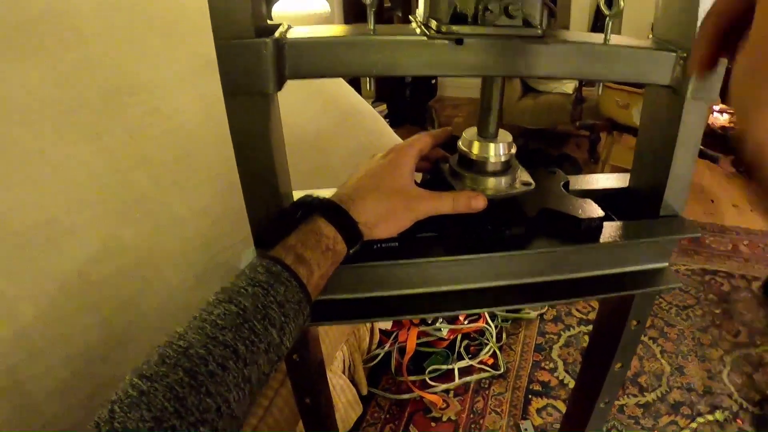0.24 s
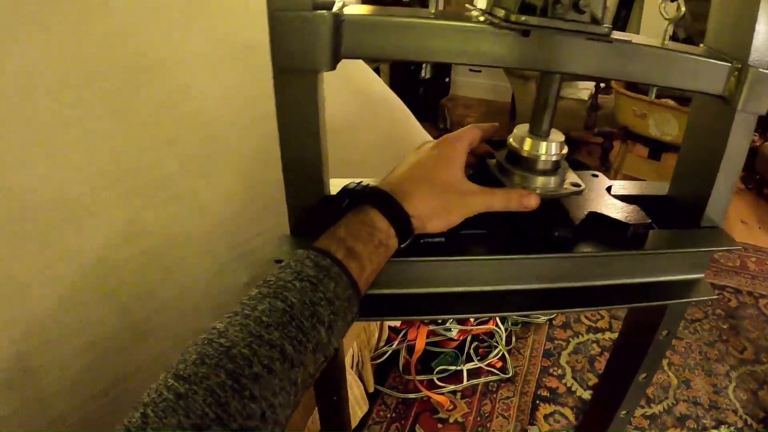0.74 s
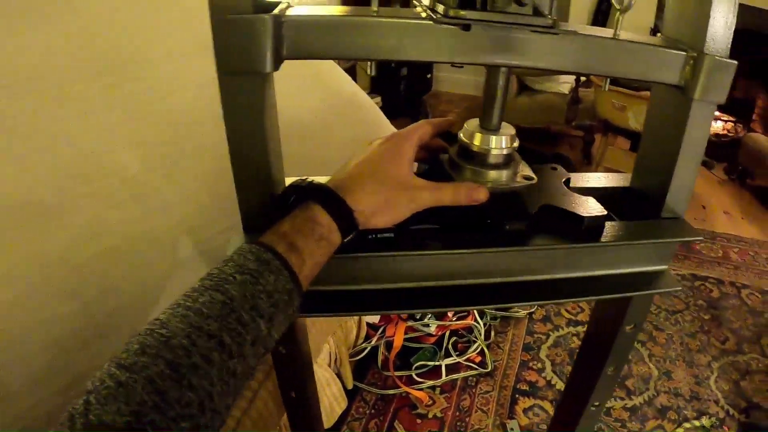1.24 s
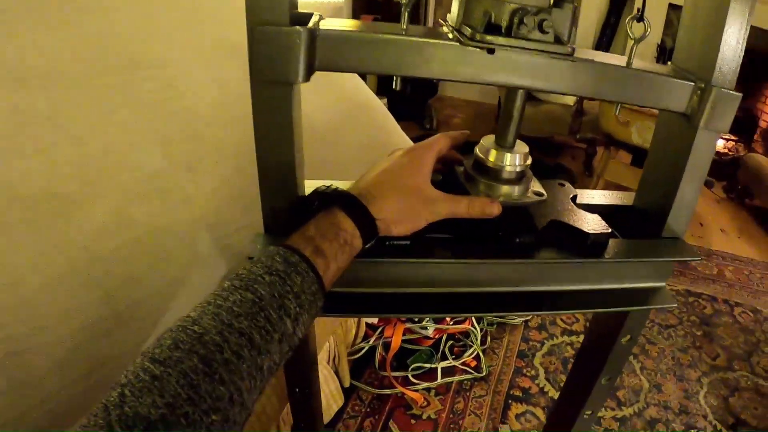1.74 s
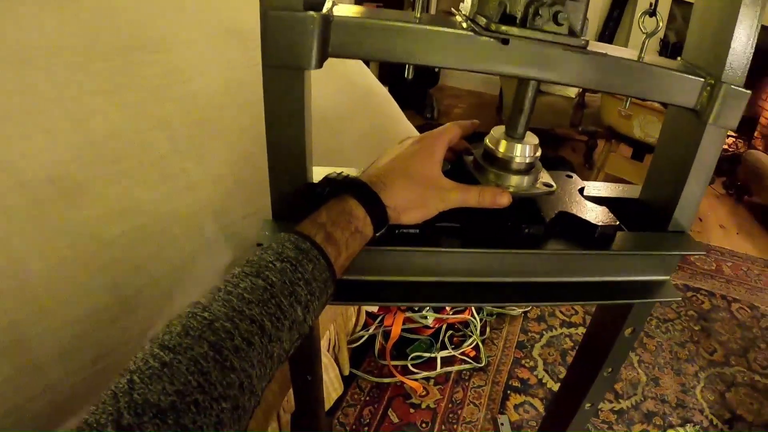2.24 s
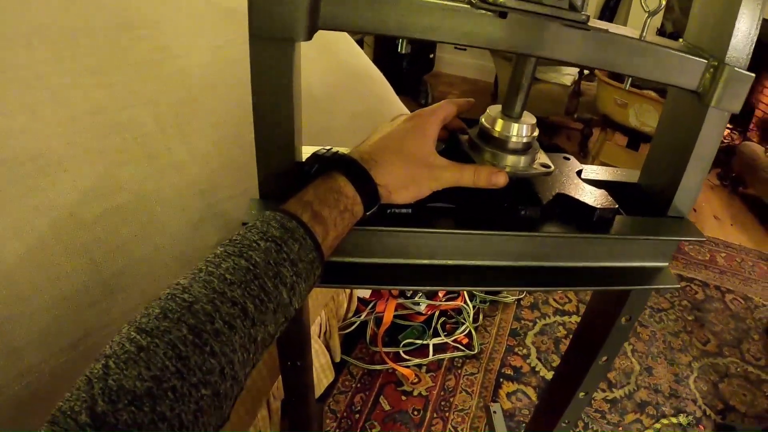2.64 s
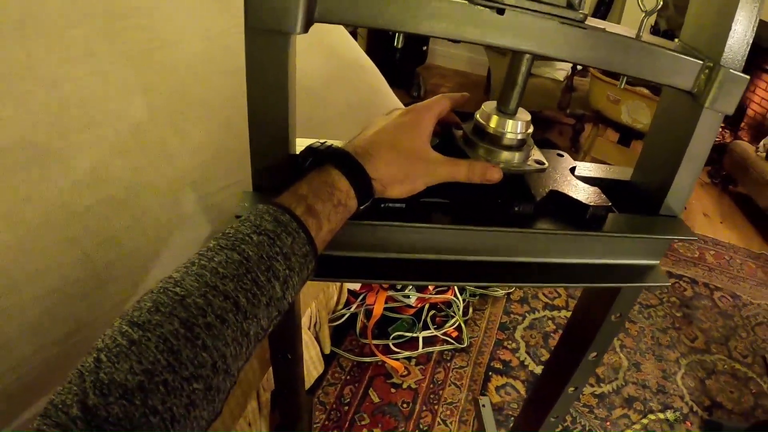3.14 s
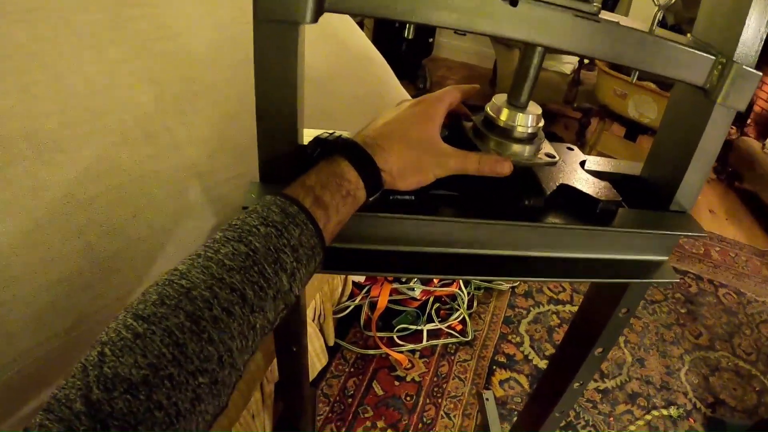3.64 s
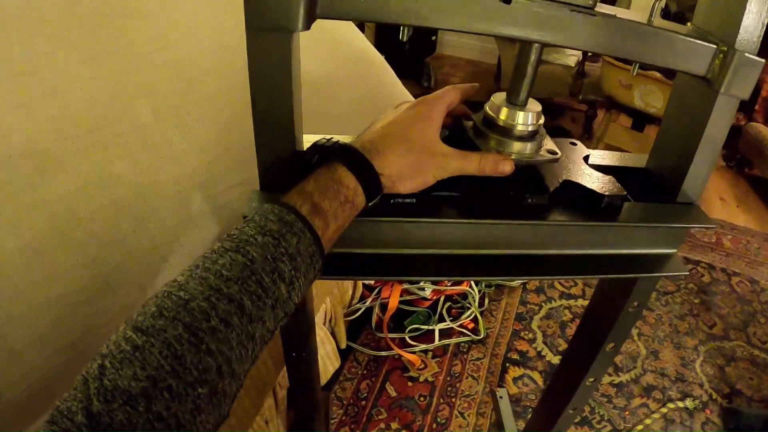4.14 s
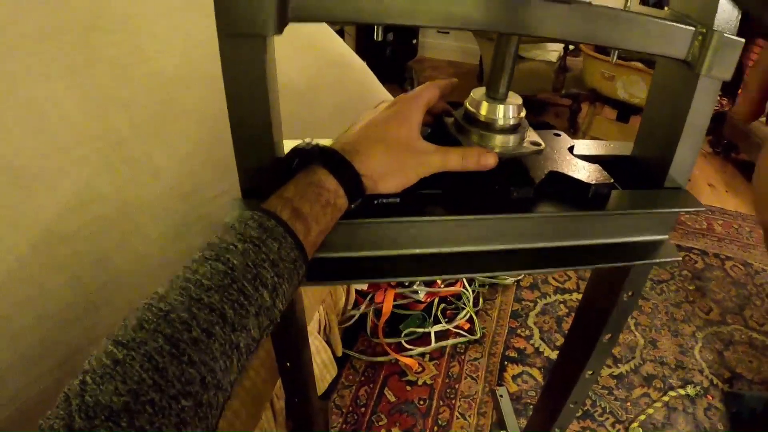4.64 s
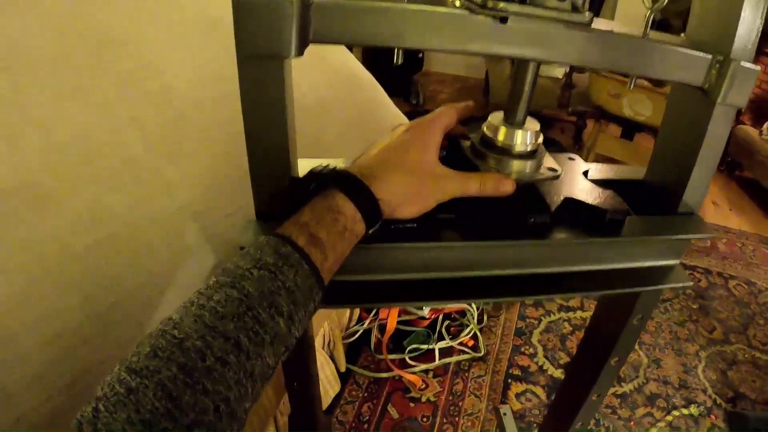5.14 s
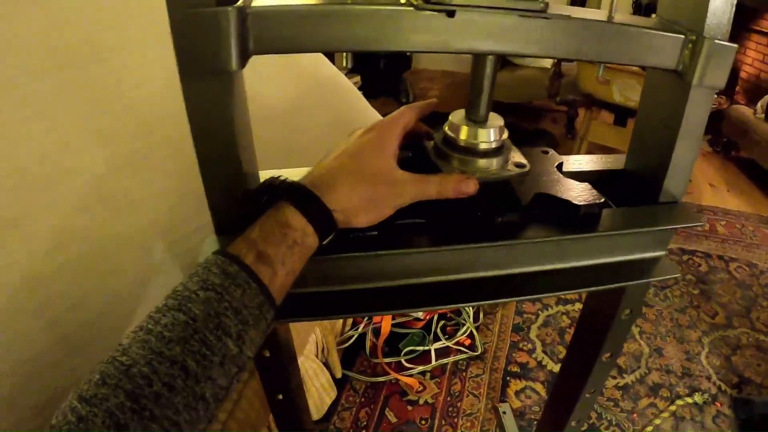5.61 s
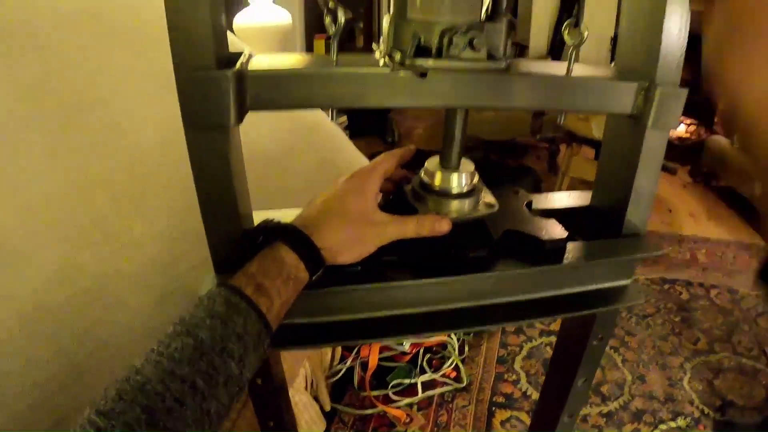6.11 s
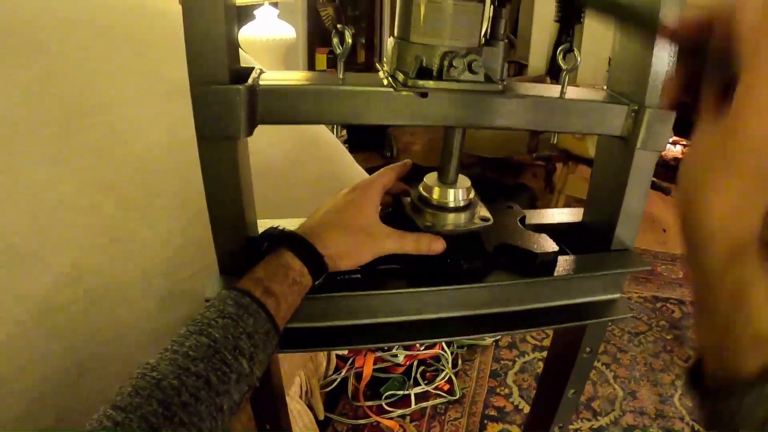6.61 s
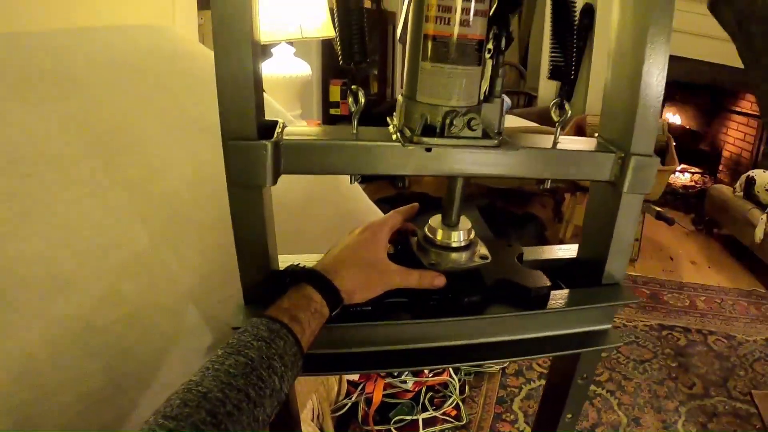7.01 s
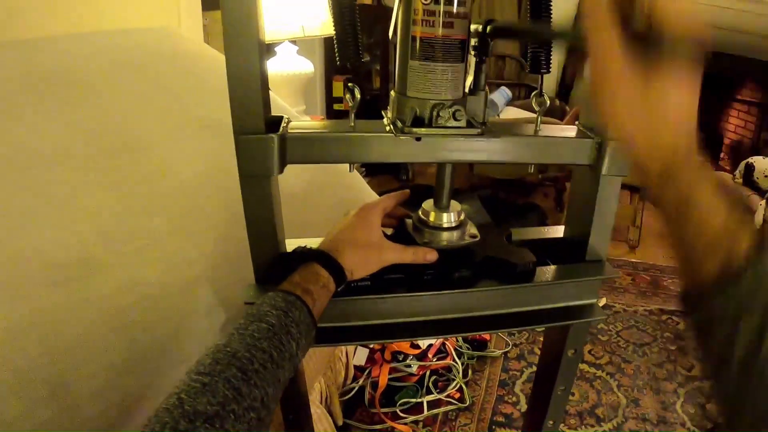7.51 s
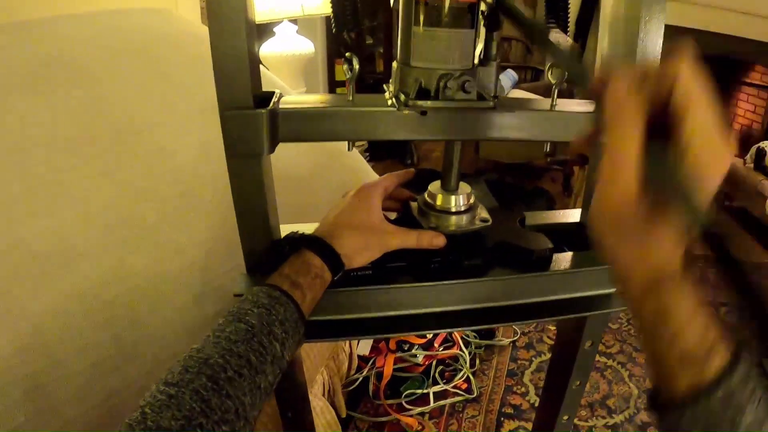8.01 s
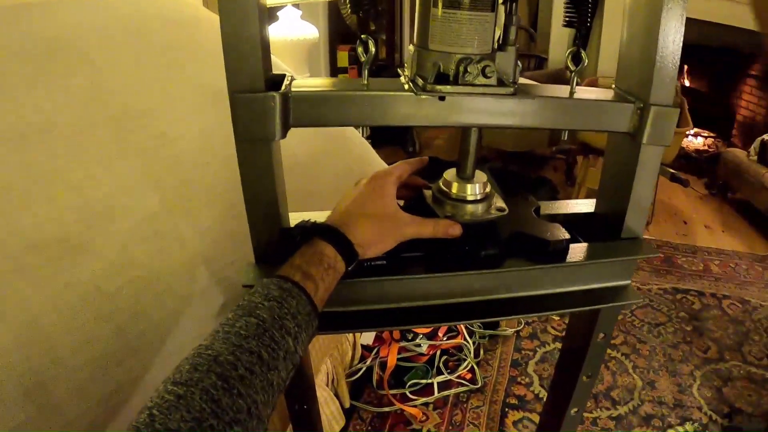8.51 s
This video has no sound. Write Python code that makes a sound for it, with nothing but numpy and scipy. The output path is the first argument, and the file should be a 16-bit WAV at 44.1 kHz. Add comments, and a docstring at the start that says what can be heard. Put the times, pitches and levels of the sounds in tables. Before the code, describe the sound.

A hydraulic jack on a steel shop press is pumped by hand, about three strokes every two seconds. Each stroke gives a metallic clack, usually followed by a dull thud, then the handle rattles in its socket and seats with a sharp tick and a short ping. Oil sings very faintly in the valve now and then. The room is quiet, with a brief ring, and the microphone is close.

```python
"""A bottle jack on a steel shop press is pumped by hand, about three strokes in two seconds, in a quiet
carpeted room. On a stroke the linkage takes up its slack, the pin scrapes and clacks, and the lever meets
its stop. On most strokes the piston then bottoms out with a thud; the hard ones rock the whole frame.
On the way back the handle rattles in its socket, then seats with a sharp tick and a short ping.
Now and then oil sings faintly in the valve, and the frame and the room ring on behind the blows."""
import sys
import numpy as np
from scipy import signal
from scipy.fft import rfft, irfft, next_fast_len
from scipy.io import wavfile
from scipy.ndimage import uniform_filter1d

SR = 44100
rng = np.random.default_rng(int(sys.argv[2]) if len(sys.argv) > 2 else 0)


def persist_wave(psi):
    """Save psi, clipped to +-1, as 16-bit WAV."""
    counts = np.round(np.clip(psi, -1, 1) * 32767).astype(np.int16)
    wavfile.write(sys.argv[1], SR, np.atleast_2d(counts).T)


N = 386302

# Levels in the cue lists are relative: each layer adds its own trim.
# Weight is a boost under about 1.7 kHz, sparkle a boost over about 4.8 kHz.
# One clack a stroke. Each row: start in seconds, pin level in dB, pin weight in dB, slack level in dB,
# wait until the stop in seconds, stop level in dB, stop weight in dB.
CLACKS = [(0.0141, -25.5, 0.5, -35, 0.014, -24.5, 8), (0.681, -22, -11.5, -32.5, .012, -26, 5.5),
          (1.9961, -22, -4, -34, .012, -24.5, 5), (2.6167, -22, -8, -36.5, 0.012, -24.5, 6),
          (3.261, -21.5, -13, -41.5, .012, -24, 4), (3.892, -23, -6, -36, .012, -24, 4),
          (4.537, -22.5, -4, -34.5, .012, -26.5, 5.5), (5.208, -21, -2.5, -34.5, .012, -26.5, 9.5),
          (5.867, -21, -13.5, -35.5, .013, -25, 11.5), (6.529, -23.5, -12, -50, .028, -23.5, 8.5),
          (7.2426, -22.5, 0.5, -38.5, .009, -25, 7.5), (7.935, -23.5, 2, -40, .009, -24, 6.5),
          (8.615, -23, -1.5, -44, .008, -22.5, 5.5)]
# The piston bottoms out. Each row: start in seconds, level in dB, weight in dB.
THUDS = [(0.209, -25.5, -10.5), (0.939, -50.5, -3), (1.549, -30.5, -7), (2.184, -29, -11.5),
         (2.8165, -30, -10), (3.455, -29.5, -10.5), (4.756, -39, -8), (5.135, -47, 6), (6.098, -36, -5.5),
         (6.7855, -36, -1.5), (8.135, -22, -6.5)]
# The handle knocks in its socket and rebounds once.
# Each row: start in seconds, level in dB, wait until the rebound in seconds, rebound level in dB.
KNOCKS = [(0.282, -22.5, .07, -32), (0.999, -36.5, 0.04, -30.5), (1.343, -37, 0.052, -35),
          (1.616, -22, 0.058, -30.5), (2.2468, -26, 0.049, -33), (2.8799, -22.5, 0.057, -32),
          (3.5111, -22, 0.05, -32.5), (4.165, -25, 0.038, -34.5), (4.808, -25, 0.033, -28),
          (5.501, -26, .036, -27.5), (6.159, -23.5, 0.047, -27.5), (6.8432, -26.5, 0.044, -29.5),
          (7.542, -26.5, .007, -25.5), (8.198, -24, 0.047, -25)]
# Oil passes the valve. Each row: start in seconds, length in seconds, level in dB.
OIL_FLOWS = [(0.424, 0.19, -52.5), (1.427, 0.26, -54.5), (2.054, 0.24, -52), (3.005, .24, -53),
             (5.908, .4, -46), (6.654, .3, -55), (7.559, 0.33, -51)]
# The handle seats again. Each row: start in seconds, tick level in dB, ping level in dB.
TICKS = [(0.459, -26, -33), (1.144, -24.5, -42), (1.7682, -19, -28), (2.376, -32.5, -36), (3.0, -19, -27.5),
         (3.6454, -18, -28), (4.2654, -20.5, -39), (4.9022, -28.5, -26.5), (5.593, -20, -23.5),
         (6.2779, -18.5, -44), (6.9727, -16.5, -28), (7.64, -31, -42), (8.3348, -25.5, -32.5)]

# EQ curves for the room tone, each kind of blow and the reverb. Each row: frequency in Hz, gain in dB.
AIR_EQ = [(12, -43), (20, -2.5), (59, 10.5), (433, -1), (603, 3.5), (1270, 7.5), (1830, -11), (2340, -0.5),
          (3970, -16), (8620, -29.5), (15000, -65)]
SLACK_EQ = [(150, -23), (600, 1.5), (1600, -2), (2400, -1.5), (3100, -3), (3900, 0), (5000, -10),
            (7800, -16.5), (11500, -37), (15000, -71)]
PIN_EQ = [(100, -28), (450, -7.5), (700, -9.5), (1150, 2), (1900, -6.5), (2500, 3.5), (3000, 2), (3900, -2),
          (4900, -15.5), (6000, -8.0), (7200, -26.5), (9500, -26.5), (11500, -44.5), (15000, -57)]
STOP_EQ = [(100, -20.5), (300, -11), (450, -11), (650, -4), (930, -0.5), (1400, -8.5), (2600, -1),
           (4150, 6.5), (5100, -8.5), (6000, -9.5), (7200, -22.5), (8300, -16), (11500, -53), (15000, -49)]
THUD_EQ = [(60, -35), (250, -4), (650, 4.5), (1150, 6), (1550, -3.5), (1850, -2), (2150, -9), (2600, -5.5),
           (3300, -8.5), (4500, -19.5), (6500, -36.5), (9500, -49.5), (11500, -75), (15000, -70)]
RATTLE_EQ = [(100, -23.5), (400, -17.5), (1000, -10.5), (1300, -2.5), (1750, -18), (2550, 3), (2900, -0.5),
             (3600, 4.5), (5200, -4.5), (6100, -6), (7300, -14.5), (9700, -15), (11200, -42), (14500, -42)]
TICK_EQ = [(100, -34.5), (450, -16), (680, -4), (1650, -10), (2300, -6), (2800, -3.5), (4100, -3),
           (5000, -16), (6100, -13.5), (7200, -23.5), (9700, -30), (11200, -52), (14500, -55)]
ROOM_EQ = [(60, 9.5), (170, 7), (280, 9), (370, 1.5), (600, -1), (1000, -2.5), (1500, 1), (2100, 0.5),
           (3600, -7.5), (4300, -2.5), (5200, -3), (9000, -1), (14000, 5)]

# The steel frame's resonances. Each row: frequency in Hz, boost or cut in dB.
FRAME_RESONANCES = [(255, 4.5), (296, 2), (438, -1), (620, 11), (942, 10), (1595, 3), (1722, 2.5),
                    (1877, -2), (2560, 4), (3260, 7), (3914, 6), (5948, 1), (9648, -0.5)]
# The room's decay. Each row: frequency in Hz, time to fall 60 dB in seconds.
ROOM_DECAY = [(150, 0.43), (400, 0.33), (1100, 0.47), (2800, 0.45), (7000, 0.37), (14000, 0.25)]
# Modes of the press rocking on its legs and of the handle pinging.
# Each row: frequency in Hz, relative level in dB, time to fall 60 dB in seconds.
SWAY_MODES = [(32.9, -5.5, 0.43), (37.6, -2.5, 0.44), (46.7, -28, 0.83), (62.5, -29.5, 1),
              (81.4, -10, 0.31), (111, -35, 0.27)]
HANDLE_MODES = [(2333, 6, 0.013), (2290, 6.5, 0.042), (4125, -1, 0.024)]

# How alike diffuse sound is at the two microphones. Each row: frequency in Hz, correlation from 0 to 1.
STEREO_LIKENESS = [(60, 0.38), (250, 0.92), (2000, 0.72), (4000, 1), (8000, 0.3), (13000, 0.24)]
# Their balance. Each row: frequency in Hz, left minus right in dB.
STEREO_BALANCE = [(35, -21), (90, -10), (160, -1.5), (600, 2.5), (1200, -1), (2500, -5.5), (4000, -10),
                  (6000, -14.5), (9500, -12.5), (12000, -1.5)]
# Their phase offset. Each row: frequency in Hz, lead of the left side in radians.
STEREO_LEAD = [(60, 1.15), (260, 1.386), (4500, 1.41), (7000, 2.44), (12000, 3.1)]

MEDIUM_DB = -26.5  # a blow of middling force


def gain_of(db):
    """Decibels to amplitude."""
    return 10 ** (np.asarray(db) / 20)


def curve(points, hz):
    """Reads a curve along a log-frequency axis."""
    f, value = np.transpose(points)
    return np.interp(np.log(hz + 1), np.log(f), value)


def add(mix, start, sound):
    """Lays a sound into the mix at a start in seconds."""
    part = mix[..., max(0, round(start * SR)):][..., :sound.shape[-1]]
    part += sound[..., :part.shape[-1]]


def causal(gain):
    """A minimum-phase EQ: its ring follows the blow."""
    log_gain = np.log(np.maximum(gain, 1e-6))
    mirrored = np.concatenate([log_gain, log_gain[-2:0:-1]])
    return np.exp(np.conj(signal.hilbert(mirrored)))[:len(gain)]


def diffuse(spectra, hz):
    """Makes two unrelated spectra partly alike, as diffuse sound is at two microphones."""
    same = np.clip(curve(STEREO_LIKENESS, hz), -1, 1)
    return np.array([same * spectra[1] + np.sqrt(1 - same ** 2) * spectra[0], spectra[1]])


def flatten(spectra, bins):
    """Evens out stereo noise so that every wide band gets an equal share."""
    return spectra * causal(uniform_filter1d(abs(spectra[1]) ** 2, size=bins) ** -.5)


def ring(modes, t):
    """One dying sine a mode, summed."""
    return sum(gain_of(db - 60 * t / t60) * np.sin(2 * np.pi * hz * t) for hz, db, t60 in modes)


def by_force(hits, weight_db, sparkle_db, weight_slope=0, sparkle_slope=0):
    """Force sets a hit's colour: weight and sparkle tilt with its level, in dB per dB."""
    return [(start, db, weight_db + weight_slope * (db - MEDIUM_DB),
             sparkle_db + sparkle_slope * (db - MEDIUM_DB)) for start, db, *_ in hits]


def blows(hits, eq, trim_db, hold_s, treble_t60, bass_t60, alike, size=8192):
    """Steel chatters on steel for hold_s, then its crowded modes die fast, the low ones last.
    Each hit: start in seconds, then level, weight and sparkle in dB."""
    t, hz = np.arange(size) / SR, np.fft.rfftfreq(size, 1 / SR)
    low = 1 / (1 + (hz / 1700) ** 4)
    high = 1 - 1 / (1 + (hz / 4800) ** 6)
    envelopes = gain_of(-60 * np.maximum(t - hold_s, 0) / np.array([[treble_t60], [bass_t60]]))
    fade = np.cos(np.pi / 2 * t / t[-1]) ** 2
    same_parts = rng.standard_normal((2, size))  # the character these hits have in common
    out = np.zeros((2, N))
    for start, db, weight_db, sparkle_db in hits:
        chatter = np.sqrt(alike) * same_parts + np.sqrt(1 - alike) * rng.standard_normal((2, size))
        treble, bass = rfft(chatter * envelopes[:, None])
        burst = flatten(diffuse(treble * (1 - low) + bass * low, hz), bins=260)
        colour = causal(gain_of(curve(eq, hz) + weight_db * low + sparkle_db * high))
        blow = fade * irfft(burst * colour)
        attack_rms = np.sqrt(np.mean(blow[1, t < .008] ** 2))
        add(out, start, gain_of(db + trim_db) * blow / attack_rms)
    return out


def air(level_db=-55, swell_db=1.8):
    """A quiet bed of room tone, swelling a little."""
    t, hz = np.arange(N) / SR, np.fft.rfftfreq(N, 1 / SR)
    noise = diffuse(rfft(rng.standard_normal((2, N))), hz)
    wash = irfft(noise * gain_of(curve(AIR_EQ, hz)), N)
    swell = sum(np.sin(2 * np.pi * (rate_hz * t + rng.random())) for rate_hz in np.geomspace(.4, 6, 20))
    return gain_of(level_db + swell_db * swell / swell.std()) * wash / wash.std()


def pin_scrape(lead_s=0.0045, softer_db=-19):
    """The pin scrapes across its hole just before it lands."""
    hits = [(start - lead_s, db + softer_db, 0, 0) for start, db, *_ in CLACKS]
    return blows(hits, SLACK_EQ, trim_db=5.5, hold_s=0.01, treble_t60=0.015, bass_t60=0.024, alike=0)


def pin_hits(sparkle_db=8.0, sparkle_per_weight=0.43):
    """The pin clacks home; a square landing gains both weight and sparkle."""
    return [(start, db, weight_db, sparkle_db + sparkle_per_weight * weight_db)
            for start, db, weight_db, *_ in CLACKS]


def frame_gain(hz, width_hz=14, loss=0.017):
    """The welded frame as an EQ: narrow resonances that widen with pitch."""
    return 1 + sum((gain_of(db) - 1) / (1 + (2 * (hz - f) / (width_hz + loss * f)) ** 2)
                   for f, db in FRAME_RESONANCES)


def room(send, build_s=0.0028, tails=7):
    """Frame ring and room reflections, crossfading between tails so each stroke rings a bit differently."""
    t, hz = np.arange(SR) / SR, np.fft.rfftfreq(SR, 1 / SR)
    colour = causal(gain_of(curve(ROOM_EQ, hz)) * frame_gain(hz))
    onset = 1 - np.exp(-(t / build_s) ** 2)
    rotation = 2 * np.arange(N) / SR  # a new tail twice a second
    out = np.zeros((2, N))
    for k in range(tails):
        band_hz, age, bands = signal.stft(rng.standard_normal((2, SR)), SR, nperseg=256)
        decay = gain_of(-60 * age / curve(ROOM_DECAY, band_hz)[:, None])
        tail = signal.istft(bands * decay, SR, nperseg=256)[1][:, :SR]
        response = irfft(flatten(diffuse(rfft(tail * onset), hz), bins=70) * colour)
        offset = abs((rotation - k) % tails - tails / 2)
        crossfade = np.cos(np.pi / 2 * np.minimum(offset, 1))
        out += signal.fftconvolve((send * crossfade)[None], response, axes=1)[:, :N]
    return out


def stop_hits(sparkle_db=3.5, sparkle_per_weight=0.6):
    """The lever meets its stop just after the pin; a square landing is both fuller and brighter."""
    return [(start + wait, db, weight_db, sparkle_db + sparkle_per_weight * weight_db)
            for start, *_, wait, db, weight_db in CLACKS]


def sway(rise_s=0.048, hard_db=-26, soft_slope=0.17):
    """Hard thuds rock the press, stops and knocks hardly at all; the rumble takes a moment to build."""
    t, out = np.arange(SR) / SR, np.zeros(N)
    rumble = ring(SWAY_MODES, t) * (1 - np.exp(-(t / rise_s) ** 2))
    for hits, send_db in ((THUDS, 3), (stop_hits(), -17), (KNOCKS, -19)):
        for start, db, *_ in hits:
            add(out, start, gain_of(db + send_db + soft_slope * min(db - hard_db, 0)) * rumble)
    return out


def thud_hits(sparkle_db=6, sparkle_slope=0.33):
    """The harder the piston bottoms out, the more it sparkles."""
    return [(start, db, weight_db, sparkle_db + sparkle_slope * (db - MEDIUM_DB))
            for start, db, weight_db in THUDS]


def touch_hits(graze_lead_s=0.0095, graze_db=-32.5, slack_lead_s=0.037,
               slack_weight_db=-19, load_share=1.63, slack_sparkle_db=4.5):
    """Light contacts: the handle grazes before a knock, the linkage takes up its slack before a clack."""
    grazes = [(start - graze_lead_s, graze_db) for start, *_ in KNOCKS]
    slack = [(start - slack_lead_s, db, slack_weight_db + load_share * stop_weight_db, slack_sparkle_db)
             for start, _, _, db, *_, stop_weight_db in CLACKS if start > slack_lead_s]
    return slack + by_force(grazes, weight_db=0.5, sparkle_db=-4.5)


def rattle_hits():
    """The handle knocks in its socket and rebounds; the soft hits are mostly body."""
    hits = KNOCKS + [(start + wait, db) for start, _, wait, db in KNOCKS]
    return by_force(hits, weight_db=8.0, sparkle_db=-0.5, weight_slope=-0.85, sparkle_slope=-0.17)


def valve(full_speed_hz=1550, width_hz=280, sag=0.43, flutter_db=2.5):
    """Oil sings in one fluttering band of noise; pitch and level rise and fall with the lever's speed."""
    out, pole = np.zeros(N), np.exp(-np.pi * width_hz / SR)
    for start, length, db in OIL_FLOWS:
        speed = np.sqrt(abs(np.sin(np.pi * np.arange(0, length, 1 / SR) / length)))
        pitch_hz = full_speed_hz * (1 - sag * (1 - speed))
        carrier = np.exp(2j * np.pi * np.cumsum(pitch_hz) / SR)
        flow = signal.lfilter([1], np.poly([pole, pole]), rng.standard_normal((2, SR)))[:, -len(speed):]
        flutter = uniform_filter1d(rng.standard_normal(SR), size=300)[:len(speed)]
        whistle = (carrier * (flow[0] + 1j * flow[1])).real
        whistle *= gain_of(flutter_db * flutter / flutter.std())
        add(out, start, gain_of(db) * speed * whistle / whistle.std())
    return out


def tick_hits():
    """The handle seats with a tick, thinner and brighter the harder it lands."""
    return by_force(TICKS, weight_db=1.6, sparkle_db=1.5, weight_slope=-0.79, sparkle_slope=0.44)


def pings(trim_db=4, rise_s=0.00085, detune=0.0015):
    """The handle rings briefly as it seats, its pitch shifting a little with the grip."""
    t, out = np.arange(SR // 10) / SR, np.zeros(N)
    for (start, _, ping_db), grip in zip(TICKS, rng.standard_normal(len(TICKS))):
        ping = ring(HANDLE_MODES, t * (1 + detune * grip)) * (1 - np.exp(-t / rise_s))
        add(out, start, gain_of(ping_db + trim_db) * ping)
    return out


def scene():
    """The blows play dry and through the frame and room, over the rumble, room tone and valve."""
    touch = blows(touch_hits(), SLACK_EQ, trim_db=-2.5,
                  hold_s=0.0071, treble_t60=0.036, bass_t60=0.25, alike=0.067) + pin_scrape()
    pin = blows(pin_hits(), PIN_EQ, trim_db=1.0,
                hold_s=0.0023, treble_t60=0.016, bass_t60=0.11, alike=0.14)
    stop = blows(stop_hits(), STOP_EQ, trim_db=3,
                 hold_s=0.0014, treble_t60=0.016, bass_t60=0.06, alike=0.24)
    thud = blows(thud_hits(), THUD_EQ, trim_db=4.5,
                 hold_s=0.011, treble_t60=0.017, bass_t60=0.097, alike=0.86)
    rattle = blows(rattle_hits(), RATTLE_EQ, trim_db=1.5,
                   hold_s=0.002, treble_t60=0.048, bass_t60=0.055, alike=0.18)
    tick = blows(tick_hits(), TICK_EQ, trim_db=-5.5,
                 hold_s=0.0031, treble_t60=0.017, bass_t60=0.24, alike=0.43)
    stroke = touch + pin + stop + thud
    direct = stroke + rattle + tick + pings()
    # loose parts pass less to the frame
    send = gain_of(-0.5) * stroke + gain_of(-3.5) * rattle + gain_of(-3) * tick
    return direct + sway() + gain_of(-2.5) * room(send[1]) + air() + valve()


def record(dry, cutoff_hz=15600):
    """Two body-worn microphones, the right one brighter, then a steep high cut."""
    size = next_fast_len(N + SR)
    hz = np.fft.rfftfreq(size, 1 / SR)
    balance = gain_of(curve(STEREO_BALANCE, hz))
    left = balance * np.exp(1j * curve(STEREO_LEAD, hz))
    equal_power = np.sqrt(2 / (1 + balance ** 2))
    microphones = np.array([left, np.ones(len(hz))]) * equal_power
    heard = irfft(rfft(dry, size) * microphones, size)[:, :N]
    high_cut = signal.firwin(511, cutoff_hz, window=("kaiser", 9), fs=SR)
    return signal.oaconvolve(heard, high_cut[None], "same")


dry = scene()
out = record(dry)
persist_wave(out)
```